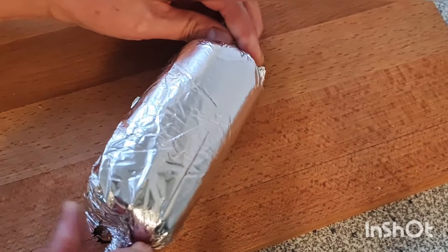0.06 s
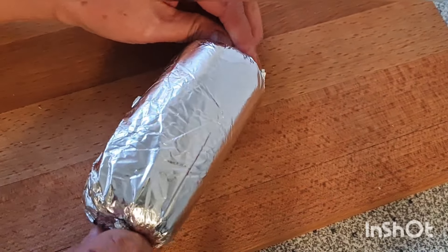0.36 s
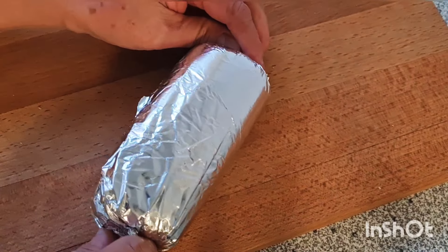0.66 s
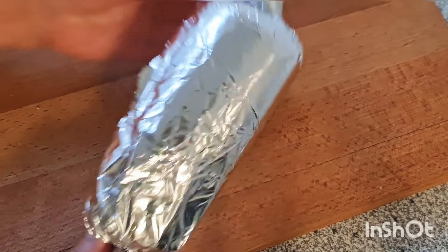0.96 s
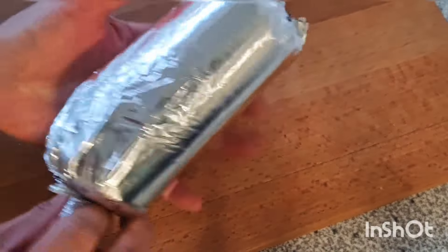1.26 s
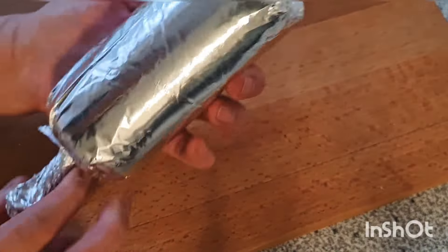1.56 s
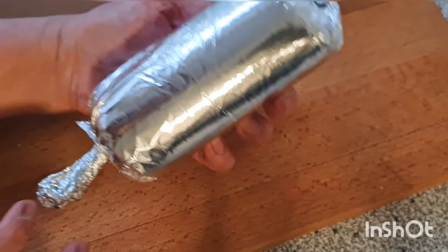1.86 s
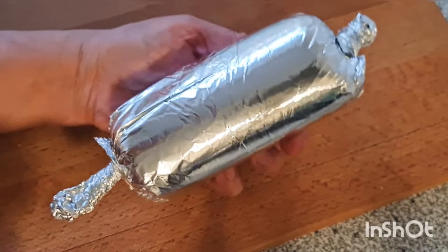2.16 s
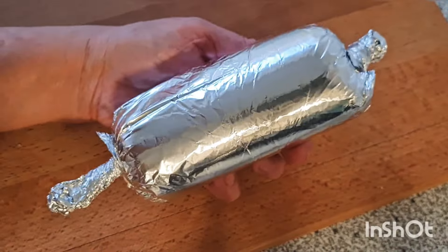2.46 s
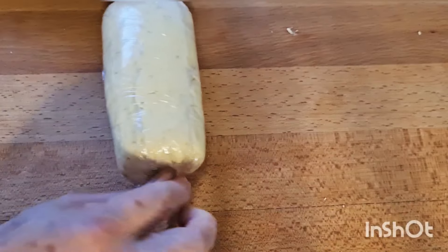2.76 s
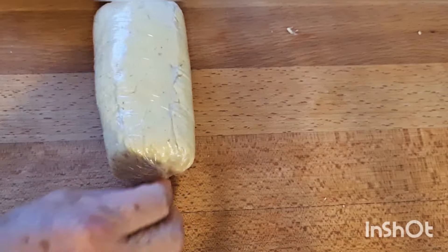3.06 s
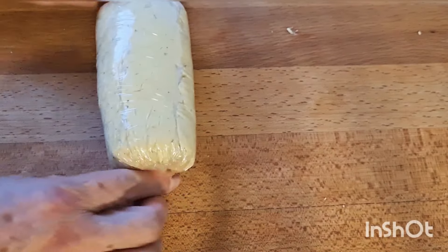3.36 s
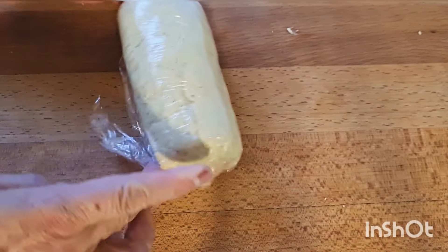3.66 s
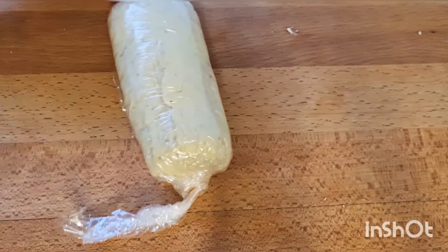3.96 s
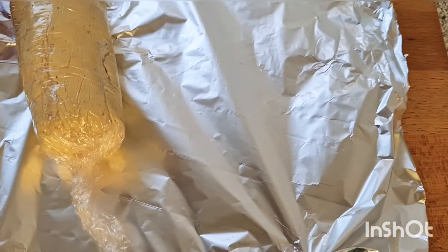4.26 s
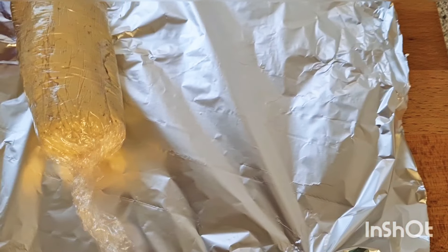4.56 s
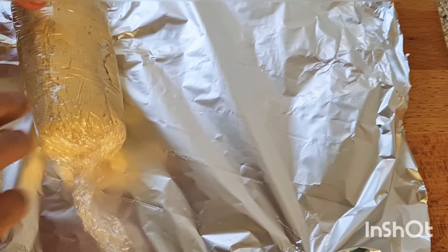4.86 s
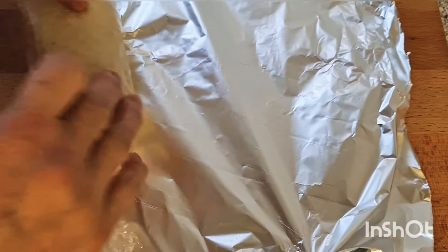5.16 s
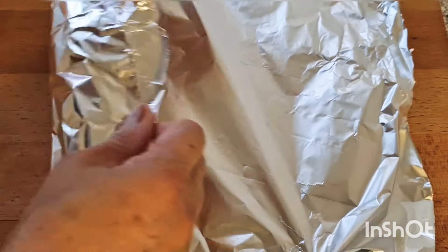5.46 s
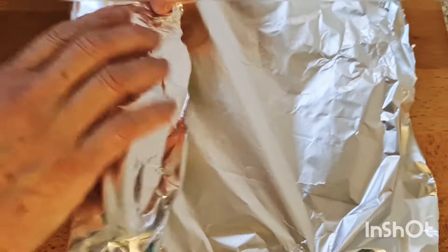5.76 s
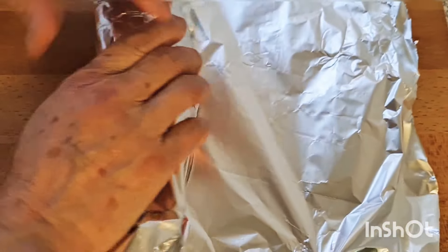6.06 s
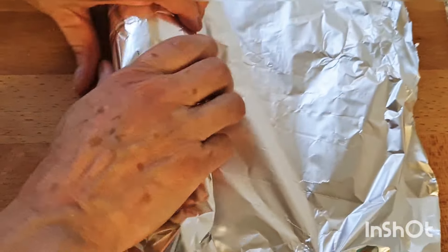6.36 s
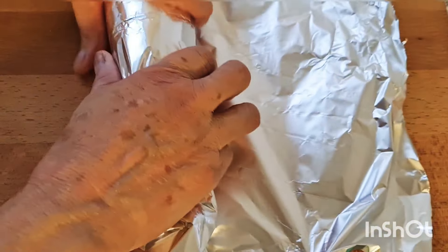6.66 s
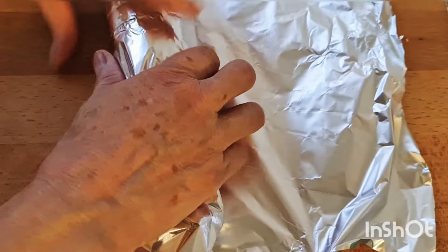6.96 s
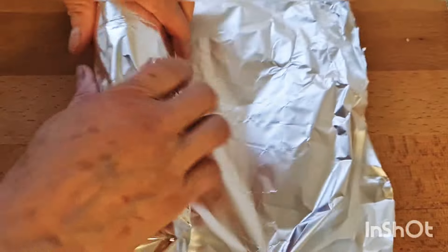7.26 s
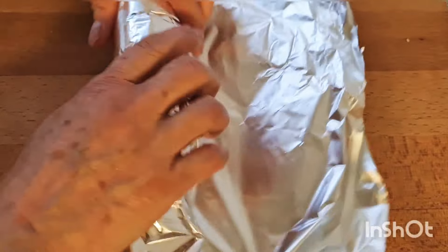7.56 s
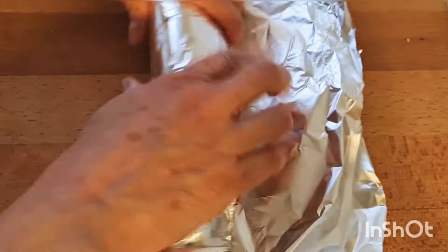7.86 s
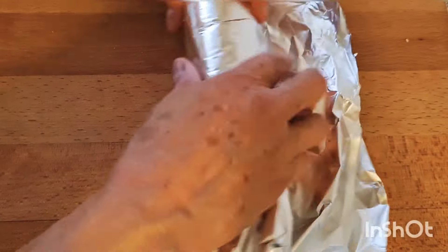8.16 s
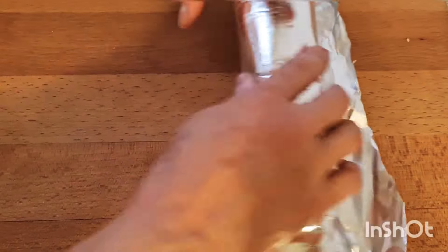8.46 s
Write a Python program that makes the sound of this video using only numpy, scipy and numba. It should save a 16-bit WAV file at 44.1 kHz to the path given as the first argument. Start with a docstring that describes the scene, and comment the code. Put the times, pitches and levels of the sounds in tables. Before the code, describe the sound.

Close to a phone microphone in a small kitchen, tightly packed foil ticks and crackles as fingers squeeze it around a food roll. A quieter stretch follows, with the thin sizzle of twisted cling film and a brief knock and rub on a wooden board. Then loud aluminium foil crinkling takes over, push after push, with snapping creases, pops and soft low bumps. A faint rumble and hum lie behind.

```python
"""First you hear sparse crackles, as hands twist the ends of a foil wrapper tight on a soft food roll.
Next, cling film sizzles as it is twirled, and the roll bumps a wooden kitchen board. Last and loudest,
the roll is turned up in a loose sheet of aluminium foil, whose tiny flat faces (facets) buckle by the
thousand, each with a click. A small room rings behind, with a low rumble and a faint hum.
It all happens close to a phone with two microphones, left and right."""
import sys
import numpy as np
from scipy import signal
from scipy.fft import rfft, irfft
from scipy.io import wavfile
from scipy.ndimage import uniform_filter1d
from numba import njit

SR = 44100
rng = np.random.default_rng(int(sys.argv[2]) if len(sys.argv) > 2 else 0)


def put_to_file(sound):
    """Save the sound as 16-bit audio at rate SR, in the file named by the first command-line argument."""
    columns = np.atleast_2d(sound).T  # one column per channel
    safe = np.clip(columns, -1, 1)
    whole_steps = np.round(safe * 32767)
    wavfile.write(sys.argv[1], SR, whole_steps.astype(np.int16))


N = 384111
TIME = np.arange(N) / SR

# A tone says how strong the lows and highs of a sound are. Each row: frequency in Hz, level in dB.
ROOM_TONE = [(15, -37), (25, 0), (50, 5), (90, 2.5), (125, -8.5), (240, -18.5), (340, -18.5), (550, -15.5),
             (900, -20.5), (1600, -23.5), (3800, -31), (5500, -25.5), (7200, -34.5), (15800, -31)]
WOOD_TONE = [(70, -29), (140, -14), (310, -11), (430, -6), (580, -4.5), (760, -7), (1300, -9.5), (2600, -9),
             (5000, -15)]
FILM_TONE = [(300, -15.5), (700, -3), (1400, 0), (2200, 2.5), (7300, -5), (9000, -1), (15800, -2.5)]
TWIST_TONE = [(250, -58), (500, -9), (1000, -5), (1400, -10), (2300, -5.5), (3200, -2.5), (7000, -4.5),
              (9200, 0), (15800, -4.5)]
SNAP_TONE = [(300, 0), (1200, -7.5), (3000, -3), (7000, -1.5), (9200, 0), (13000, -1), (16000, -5)]
SHEET_TONE = [(59, -36), (100, -25), (163, -16), (282, -10), (405, -2), (1030, -6.5), (1240, -7.5),
              (1500, -5), (3160, -3), (7520, -4.5), (12500, -0.5), (15800, -4)]
# Where the board and the sheet ring. Each row: frequency in Hz, width in Hz, boost (or cut) in dB.
WOOD_RESONANCES = [(242, 57, -13), (312, 25, 14), (575, 100, 6), (1290, 150, 7)]
SHEET_RESONANCES = [(389, 19, 6.5), (650, 23, 1.5), (1282, 88, 6), (3080, 97, 2.5), (6400, 890, 0.5),
                    (9060, 880, 3)]

# The room's own noise. Each row: time in seconds, level in dB.
ROOM_LEVELS = [(0, -56), (2.5, -59), (2.7, -62), (4.2, -61.5), (4.5, -64), (8.7, -57.5)]
# The opening drone. Each row: pitch in Hz, level in dB relative to the drone's setting.
DRONE_NOTES = [(84, -1), (145, -4.5), (189, -4.5), (227, -9.5)]
# The far hum wanders. Each row: time in seconds, base pitch in Hz.
HUM_PITCHES = [(3.55, 190.7), (3.75, 185), (3.95, 191.4), (4.13, 183), (4.31, 180), (4.7, 196), (4.9, 188)]
# Its overtones. Each row: start and hold in seconds, multiple of the base pitch, level in dB.
HUM_OVERTONES = [(3.55, .6, 4, -71), (3.74, .3, 4, -72), (3.9, .4, 2, -81.5), (3.597, 0.56, 3, -77.5),
                 (4.183, .12, 3, -69), (4.782, .08, 4, -70)]
# Dull, low thuds: bumps on the board, and a few deeper thumps from the worktop or the handled phone.
# Each row: start in seconds, level in dB, pitch in Hz.
THUDS = [(0.973, -53.5, 184), (2.6, -44, 57.6), (2.841, -32, 169), (2.93, -35.5, 164), (3.223, -55, 167),
         (4.389, -45, 83), (4.947, -34, 50), (5.052, -34, 163), (5.096, -32, 153), (5.219, -34.5, 160),
         (5.784, -37, 143), (6.06, -35, 176), (6.362, -39, 110), (6.513, -34, 176), (6.69, -32.5, 184),
         (7.276, -36, 157.3), (7.702, -43, 158)]
# The roll scuffs the wood.
# Each row: loudest moment in seconds, level in dB, rise and fall in seconds, treble limit in Hz.
BOARD_SCUFFS = [(.8, -47, .09, 0.073, 704), (0.96, -41.5, 0.0084, 0.03, 880),
                (2.069, -44, 0.0032, 0.032, 666), (2.818, -29, 0.018, 0.016, 2080),
                (2.854, -26.5, 0.011, 0.011, 1680), (2.88, -30.5, 0.018, 0.019, 710),
                (2.929, -29, .002, 0.015, 1160), (5.06, -46, 0.054, 0.074, 700)]
# The film sizzles while pulled taut, less once let go. Each row: time in seconds, level in dB.
FILM_TENSION = [(2.54, -49), (3.0, -45.5), (3.56, -44), (3.8, -52), (4.315, -54)]
# Hands twirl the film. Each row: start and hold in seconds, level in dB.
FILM_TURNS = [(2.548, 0.036, -41.5), (2.69, .13, -46), (2.92, 0.058, -42), (3.175, 0.039, -42),
              (3.31, 0.017, -39), (3.405, 0.038, -39), (3.71, 0.037, -40.5), (4.13, 0.033, -52)]
# Fingers squeeze the foil ends. Each row: start and hold in seconds, level in dB.
END_SQUEEZES = [(.01, 0.066, -52), (.22, 0.054, -49.5), (.335, 0.074, -52), (.615, 0.049, -58),
                (.78, 0.19, -53), (.835, 0.009, -40.5), (1.07, 0.16, -51), (1.41, 0.26, -48.5),
                (1.445, 0.009, -36.5), (1.75, 0.013, -59)]
# Foil panels pop through. Each row: start in seconds, level in dB, pitch in Hz.
PANEL_POPS = [(.059, -37.5, 2176), (.323, -44, 1004), (0.322, -39, 4720), (1.575, -36, 3720),
              (1.666, -35, 2280), (1.666, -38, 3030), (4.85, -39.5, 2080), (4.852, -46, 560),
              (4.95, -26.5, 624), (5.045, -27.5, 615), (5.616, -29, 1216), (6.608, -21, 1287),
              (6.633, -18.5, 1255), (6.714, -16, 1250), (7.968, -18, 2900), (8.078, -18, 3080)]
# Single creases snap. Each row: start in seconds, level in dB, relative level of the lower ring in dB.
CREASE_SNAPS = [(.042, -24, -29), (0.056, -22, -1.5), (.199, -42, 5), (.219, -30, -33), (0.303, -30, -14),
                (.359, -48, -23), (0.324, -20.5, -21), (0.38, -23.5, -26), (0.509, -51.5, 12.5),
                (.61, -31.5, -28), (0.633, -34, -21), (0.717, -37, -28), (0.775, -43, 2),
                (0.818, -26.5, -4.5), (.843, -17, -6), (0.903, -27.5, -1.5), (1.053, -32, -10),
                (1.092, -32, -15), (1.128, -30, -12), (1.214, -32.5, -10), (1.25, -33, -9),
                (1.297, -34, -10), (1.403, -30.5, -14), (1.448, -18.5, -3), (1.527, -23, -21),
                (1.573, -28, -7), (1.612, -23, -31), (1.664, -27, -15), (1.745, -39.5, -18),
                (1.956, -29.5, -11), (2.353, -35.5, -19), (3.666, -30, -24), (3.86, -49, -23),
                (3.943, -37, -19), (4.391, -51.5, -21), (4.849, -22, -13), (4.903, -14, -31),
                (5.201, -7.5, -22), (5.617, -13, 1), (5.728, -18, -13), (6.092, -7, -11), (6.148, -17, -8),
                (6.178, -13, -6), (6.236, -14, -22), (6.399, -20, -12), (6.608, -18, 7), (6.69, 3, -10),
                (6.717, -9, 4.5), (7.175, -5.5, -28), (7.504, -17, -23), (7.703, -8, -22),
                (8.056, -16, -18), (8.173, -7, -26), (8.596, -10.5, 0)]
# The sheet flaps onto the board. Each row: start in seconds, level in dB.
SHEET_FLAPS = [(5.061, -34), (5.44, -37.5), (6.08, -34.5), (6.32, -40.5), (6.54, -44), (6.71, -41),
               (7.425, -43), (7.795, -39), (7.99, -45), (8.134, -30.5)]
# Hands roll up the sheet. Each row: start and hold in seconds, crackle in dB, drumming in dB.
SHEET_PUSHES = [(4.911, 0.059, -34, -43), (5.017, 0.27, -27.5, -40.5), (5.344, 0.15, -26, -38.5),
                (5.518, 0.079, -29.5, -43), (5.741, 1.15, -24, -40), (6.974, 0.19, -26.5, -45.5),
                (7.134, 0.22, -25, -39), (7.422, 0.5, -23, -38), (7.785, 0.91, -22, -35.5)]
# Folds give way. Each row: start and hold in seconds, crackle in dB, wide panels in dB.
FOLD_SURGES = [(4.942, 0.17, -25.5, -30), (5.207, .018, -21.5, -35), (5.731, 0.019, -18, -38),
               (5.795, 0.035, -17, -31), (5.861, 0.046, -15.5, -27.5), (6.09, 0.0061, -21, -26),
               (6.466, 0.049, -25, -28.5), (6.388, 0.047, -18, -29.5), (6.607, 0.037, -26, -25.5),
               (6.686, 0.047, -18, -25.5), (6.794, 0.064, -16.5, -32), (7.149, 0.042, -20, -29.5),
               (7.208, 0.085, -22, -34.5), (7.926, 0.13, -23.5, -39), (7.505, .012, -19, -40),
               (7.816, 0.019, -18, -29), (8.053, 0.067, -16.5, -26.5), (8.146, 0.082, -22.5, -29),
               (8.335, 0.033, -18.5, -27.5), (8.43, 0.028, -21, -29)]
# The lifted sheet settles between pushes. One row: start and hold in seconds, level in dB.
SHEET_SETTLING = (4.86, 2.3, -32.5)

PUSH_RISE_S, PUSH_FALL_S = 0.022, 0.028


def undb(db):
    """Turn decibels into a number to multiply by."""
    return 10 ** (np.asarray(db) / 20)


def unit(x):
    """Scale a signal so that its average power is 1."""
    return x / np.sqrt(np.mean(x ** 2))


def smooth(x, first, second):
    """Average twice, over these numbers of samples."""
    return uniform_filter1d(uniform_filter1d(x, first), second)


def even(x):
    """Hold the level near 1, so that the hand alone sets the swell."""
    power = smooth(np.mean(x ** 2, axis=0), 1800, 900)
    return x / np.sqrt(np.maximum(power, 0) + 1e-4 * power.mean())


def curve(rows):
    """Join (time, value) points with straight lines."""
    return np.interp(TIME, *np.transpose(rows))


def during(start, end):
    """One between two times and zero outside, with short soft edges."""
    return uniform_filter1d(1. * ((TIME >= start) & (TIME <= end)), size=400)


def swells(rows, rise_s, fall_s):
    """Each (start, hold, dB) rises up to its start, holds and dies away; overlapping powers add."""
    t, power = TIME[::32], 0
    for start, hold, db in rows:
        slopes = np.minimum((t - start) / rise_s, (start + hold - t) / fall_s)
        power += (undb(db) * np.exp(np.minimum(slopes, 0))) ** 2
    return np.interp(TIME, t, np.sqrt(power))


def waver(count):
    """Several slow random drifts."""
    return unit(smooth(rng.standard_normal((count, N)), 5000, 5000))


def pan(db):
    """Make the left side this many dB louder than the right."""
    return undb(np.array([[db], [-db]]) / 2)


def band(x, hz, kind, order=3):
    """Keep the lows, the highs or a band in between."""
    return signal.sosfilt(signal.butter(order, hz, kind, fs=SR, output="sos"), x)


def colour(x, tone, resonances=(), size=4096):
    """Give a sound a tone and a few resonances."""
    hz = np.fft.rfftfreq(size, 1 / SR) + 1
    tone_hz, tone_db = np.transpose(tone)
    db = np.interp(np.log(hz), np.log(tone_hz), tone_db)
    db += sum(boost / (1 + (2 * (hz - centre) / width) ** 2) for centre, width, boost in resonances)
    # make the filter ring only after a click, so that the click stays sharp
    cepstrum = irfft(np.log(undb(db)))
    cepstrum[1:size // 2] *= 2
    cepstrum[size // 2 + 1:] = 0
    response = irfft(np.exp(rfft(cepstrum)))
    return signal.oaconvolve(x, response[None], axes=1)[:, :x.shape[1]]


def room_noise():
    """A low rumble, much alike on both sides, with faint hiss."""
    mid, side = rng.standard_normal((2, N))
    side = 0.34 * side + band(side, 280, "high", order=1)
    noise = colour(np.array([mid + side, mid - side]), ROOM_TONE)
    return unit(noise) * undb(curve(ROOM_LEVELS)) * pan(-1.4)


def drone(level_db=-70, end_s=2.53, waver_rad=1.9):
    """A few faint, low notes waver at the start."""
    notes = sum(undb(db) * np.sin(2 * np.pi * hz * TIME + waver_rad * drift)
                for (hz, db), drift in zip(DRONE_NOTES, waver(len(DRONE_NOTES))))
    return np.sqrt(2) * notes * undb(level_db) * during(0, end_s)


def far_hum(waver_rad=0.55):
    """A faint, wavering hum whose overtones come and go."""
    phase = 2 * np.pi * np.cumsum(curve(HUM_PITCHES)) / SR
    hum = 0
    for (start, hold, multiple, db), drift in zip(HUM_OVERTONES, waver(len(HUM_OVERTONES))):
        level = swells([(start, hold, db)], rise_s=0.03, fall_s=0.023)
        hum += np.sin(multiple * phase + waver_rad * drift) * level
    return np.sqrt(2) * hum


def kitchen_echo(x, ring_s=0.12, echo_db=-8, patterns=8, size=16384):
    """Worktop and walls add a short echo; its pattern switches at random, as if the creases moved."""
    t, echo = np.arange(size) / SR, 0
    fade = np.exp(-np.log(1000) * t / ring_s) * (t > .003)
    place = np.repeat(rng.integers(0, patterns, N // 512 + 1), 512)[:N]
    for k in range(patterns):
        tail = band(rng.standard_normal((2, size)), [300, 11000], "band", order=1) * fade
        share = uniform_filter1d(1. * (place == k), size=256)
        echo += signal.oaconvolve(x * share, unit(tail) / np.sqrt(size), axes=1)[:, :N]
    return x + undb(echo_db) * echo


def low_thuds(roughness=0.25, swell_s=0.0092, detune=0.15, size=8192):
    """Board bumps and deeper worktop or phone thumps: four close, low notes quickly swell and die."""
    out, t = np.zeros((2, N + size)), np.arange(size) / SR
    swell = (t / swell_s / 2) ** 2 * np.exp(2 - t / swell_s)
    for start_s, db, hz in THUDS:
        pitches = hz * (1 + detune * rng.uniform(-0.83, 1, (4, 1)))
        ring = np.sin(2 * np.pi * pitches * t).mean(axis=0)
        noise = unit(band(rng.standard_normal(size), [hz / 2, 2 * hz], "band", order=2))
        thud = (ring + roughness * noise) / np.hypot(1, roughness)
        start = int(start_s * SR)
        out[:, start:start + size] += undb(db) * swell * thud
    return out[:, :N] * pan(-3.1)


def board_scuffs():
    """The roll rubs over the wood in short, dull bursts of noise."""
    rub = unit(colour(rng.standard_normal((2, N)), WOOD_TONE, WOOD_RESONANCES))
    out = 0
    for peak_s, db, rise, fall, hz in BOARD_SCUFFS:
        slopes = np.minimum((TIME - peak_s) / rise, (peak_s - TIME) / fall)
        out += band(rub, hz, "low") * np.exp(np.maximum(slopes, -30)) * undb(db)
    return out


def facet_clicks(count, ring_s, uneven_db, alike, size=1024):
    """Each facet rings briefly with its own uneven tone, only partly alike at the two microphones."""
    t = np.arange(size) / SR
    noise = rng.standard_normal((count, 3, size))
    lengths = ring_s * np.exp(0.28 * rng.standard_normal((count, 1, 1)))
    fade = np.exp(-t / lengths) / np.sqrt(lengths)
    common, own = noise[:, :1] * fade, noise[:, 1:] * fade
    clicks = np.roll(np.sqrt(alike) * common + np.sqrt(1 - alike) * own, 96, axis=2)
    clicks[:, 0] = np.roll(clicks[:, 0], 15, axis=1)  # the left microphone is a little further away
    low_to_high = np.sqrt(np.linspace(0, 1, size // 2 + 1))
    ripples = np.array([np.interp(low_to_high, np.linspace(0, 1, 40), row)
                        for row in rng.standard_normal((count, 40))])
    return irfft(rfft(clicks) * undb(uneven_db * ripples)[:, None])


@njit
def scatter(starts, gains, which, clicks):
    """Lay one click at each start."""
    out = np.zeros((2, N + clicks.shape[2]))
    for k in range(len(starts)):
        for side in range(2):
            for i in range(clicks.shape[2]):
                out[side, starts[k] + i] += gains[k] * clicks[which[k], side, i]
    return out[:, :N]


def crinkle(per_s, spread_db, bunch_db, ring_s, uneven_db, alike):
    """Facets buckle in little avalanches: many small clicks, a few large ones."""
    avalanche = unit(smooth(rng.standard_normal(N), 300, 150))
    starts = np.flatnonzero(rng.random(N) < per_s / SR)
    sizes = np.minimum(rng.exponential(size=N), 4)
    clicks = facet_clicks(300, ring_s, uneven_db, alike)
    which = rng.integers(0, len(clicks), N)
    gains = undb(spread_db * sizes[starts] + bunch_db * avalanche[starts])
    return scatter(starts, gains, which[starts], clicks)


def cling_film(folds_db=-13):
    """Thin film sizzles in tiny, dense ticks, louder at each turn; its gathered folds rub lower."""
    ticks = crinkle(per_s=3500, spread_db=-0.7, bunch_db=0.7, ring_s=0.0014, uneven_db=4.5, alike=0.18)
    ticks = colour(ticks, FILM_TONE)
    sizzle = even(band(ticks, 3700, "high"))
    folds = even(band(ticks, 4170, "low")) * undb(folds_db)
    effort = np.hypot(undb(curve(FILM_TENSION)), swells(FILM_TURNS, rise_s=0.016, fall_s=0.022))
    return (sizzle + folds) * effort * during(FILM_TENSION[0][0], FILM_TENSION[-1][0])


def twisted_ends(grip_db=-54.5):
    """Tightly packed foil crackles finely at each squeeze, and ticks faintly in the hand between them."""
    clicks = crinkle(per_s=860, spread_db=5, bunch_db=2, ring_s=0.0027, uneven_db=6.5, alike=0.44)
    squeeze = swells(END_SQUEEZES, rise_s=0.023, fall_s=0.018)
    grip = undb(grip_db) * during(0.72, 1.8)
    return even(colour(clicks, TWIST_TONE)) * np.hypot(squeeze, grip)


def panel_pops(rise_s=0.000057, ring_s=0.0071, detune=0.068, notes=6, size=4096):
    """A foil panel pops through and rings with close notes that reach the microphones out of step."""
    out, t = np.zeros((2, N + size)), np.arange(size) / SR
    fade = np.exp(-t / ring_s) * (1 - np.exp(-t / rise_s))
    for start_s, db, hz in PANEL_POPS:
        pitches = hz * (1 + detune * rng.standard_normal((notes, 1)))
        cycles = pitches * t + rng.random((2, notes, 1))
        ring = unit(np.sin(2 * np.pi * cycles).sum(axis=1))
        start = int(start_s * SR)
        out[:, start:start + size] += undb(db) * ring * fade
    return out[:, :N]


def crease_snaps(tick_s=0.00038, build_s=0.0012, crack_s=0.003, ring_s=0.012, uneven_db=3, size=4096):
    """A crease flips: a sharp tick, a crack that builds as it runs, a shimmer and a lower panel ring."""
    out, t = np.zeros((2, N + size)), np.arange(size) / SR
    tone_hz = np.geomspace(800, 16000, 28)
    tick = undb(1) * np.exp(-t / tick_s)
    build = 1 - np.exp(-t / build_s)
    ring = np.exp(-t / ring_s)
    shimmer = undb(-14) * ring
    crack_shape = tick + build * (np.exp(-t / crack_s) + shimmer)
    for start_s, db, panel_db in CREASE_SNAPS:
        noise = rng.standard_normal((3, size))
        noise = noise[1:] + .5 * noise[0]  # partly alike on both sides
        crack = undb(-4.5) * band(noise * crack_shape, 2200, "high", order=2)
        panel = undb(panel_db) * band(noise * build * ring, [650, 3400], "band", order=2)
        own_tone = np.c_[tone_hz, uneven_db * rng.standard_normal(len(tone_hz))]
        start = int(start_s * SR)
        out[:, start:start + size] += colour(crack + panel, own_tone) * undb(db)
    return colour(out[:, :N], SNAP_TONE)


def sheet_on_board(flap_hold_s=0.041, rumble_db=-16.5):
    """The pushed sheet drums on the board and now and then flaps down on it."""
    taps = crinkle(per_s=250, spread_db=3.5, bunch_db=4, ring_s=0.013, uneven_db=5, alike=0.15)
    taps = colour(taps, SHEET_TONE, SHEET_RESONANCES)
    push = swells([(s, hold, db) for s, hold, _, db in SHEET_PUSHES], PUSH_RISE_S, PUSH_FALL_S)
    flap = swells([(s, flap_hold_s, db) for s, db in SHEET_FLAPS], rise_s=0.024, fall_s=0.01)
    # the wide sheet pushes air towards one microphone while it draws it from the other
    drum = even(band(taps - 0.42 * taps[::-1], [230, 830], "band")) * pan(0.96)
    # the weight of the roll rumbles through the board, much alike on both sides
    rumble = even(band(taps + 0.54 * taps[::-1], [75, 250], "band")) * undb(rumble_db)
    return (drum + rumble) * np.hypot(push, flap)


def loose_sheet(panels_db=-6, rise_s=0.01, fall_s=0.024):
    """At each push small facets crackle and wide panels flex lower; both surge when a fold gives way."""
    small = crinkle(per_s=2000, spread_db=2.5, bunch_db=1, ring_s=0.0034, uneven_db=4, alike=0.19)
    small = colour(small, SHEET_TONE, SHEET_RESONANCES)
    wide = crinkle(per_s=1000, spread_db=0.5, bunch_db=1, ring_s=0.0039, uneven_db=7.5, alike=0.22)
    wide = colour(wide, SHEET_TONE, SHEET_RESONANCES)
    push = swells([(s, hold, db) for s, hold, db, _ in SHEET_PUSHES], PUSH_RISE_S, PUSH_FALL_S)
    motion = np.hypot(push, swells([SHEET_SETTLING], rise_s, fall_s))
    crush = swells([(s, hold, db) for s, hold, db, _ in FOLD_SURGES], rise_s, fall_s)
    flex = swells([(s, hold, db) for s, hold, _, db in FOLD_SURGES], rise_s, fall_s)
    crackle = even(band(small, 5340, "high")) * np.hypot(motion, crush)
    panels = even(band(unit(wide) + 0.77 * unit(small), [850, 4400], "band"))
    panels *= np.hypot(undb(panels_db) * motion, flex)
    return crackle * pan(-1.4) + panels * pan(-0.64)


def scene():
    """Foil, thuds and scuffs echo in the kitchen; the faint film and the background have no echo."""
    foil = twisted_ends() + loose_sheet() + sheet_on_board() + crease_snaps() + panel_pops()
    handling = foil + low_thuds() + board_scuffs()
    return kitchen_echo(handling) + cling_film() + room_noise() + far_hum() + drone()


def record(dry):
    """The phone cuts the highest treble, above 15800 Hz."""
    return signal.sosfilt(signal.ellip(12, .1, 75, 15800, fs=SR, output="sos"), dry)


dry = scene()
out = record(dry)
put_to_file(out)
```